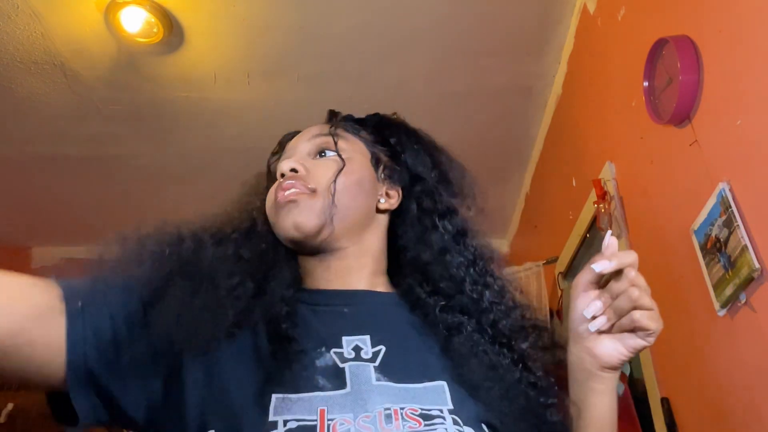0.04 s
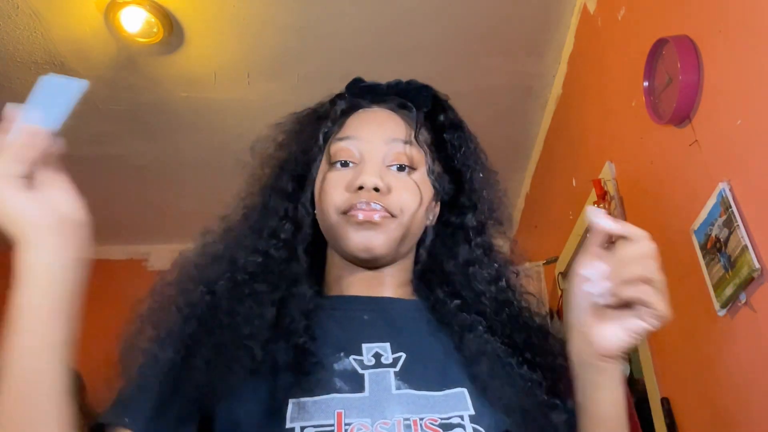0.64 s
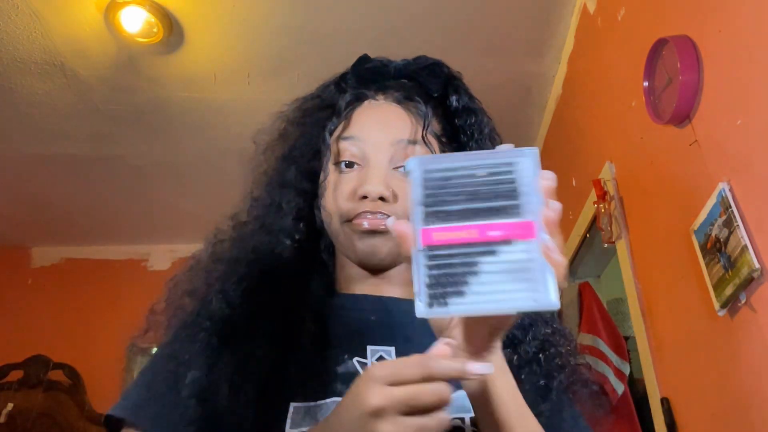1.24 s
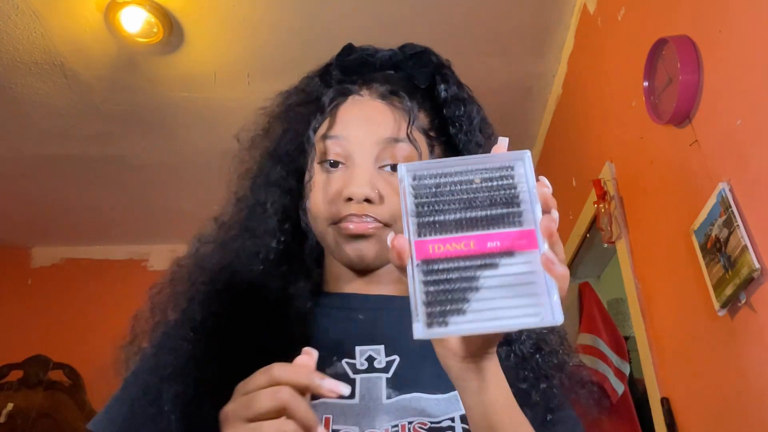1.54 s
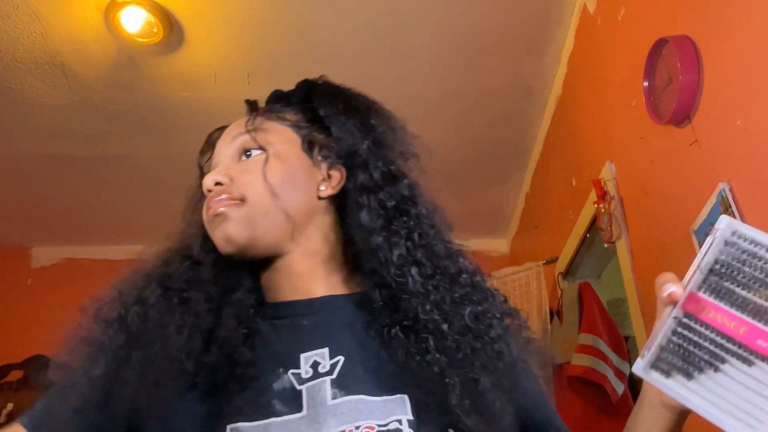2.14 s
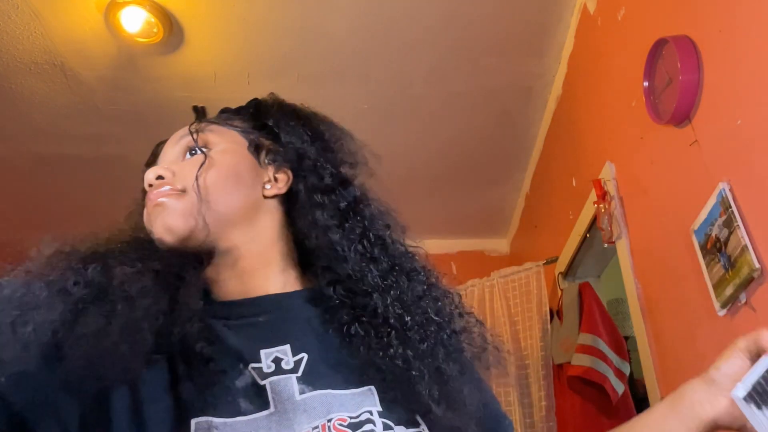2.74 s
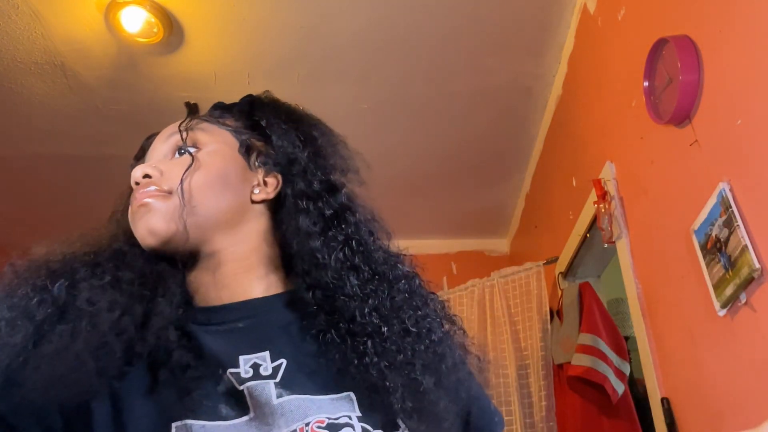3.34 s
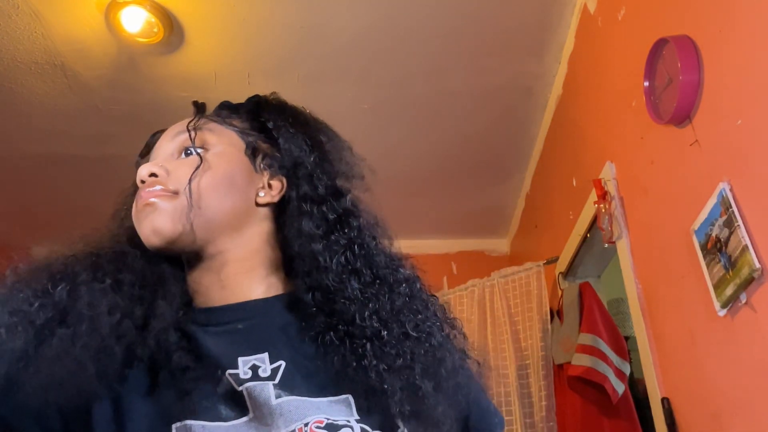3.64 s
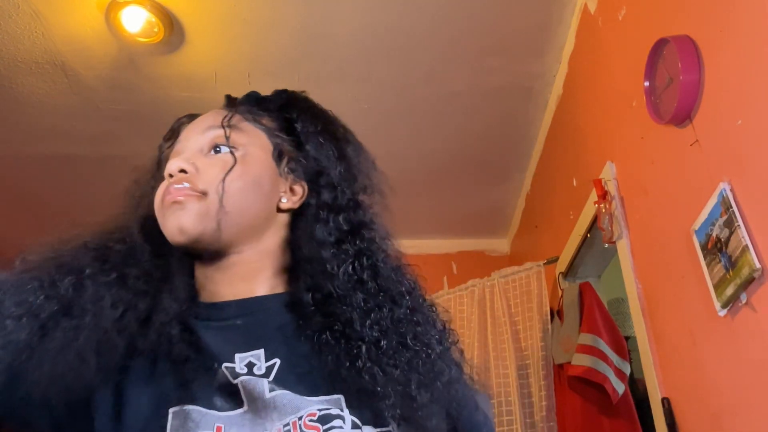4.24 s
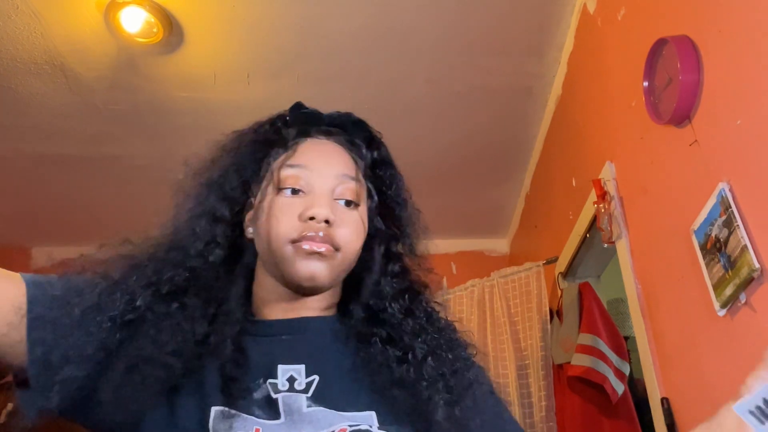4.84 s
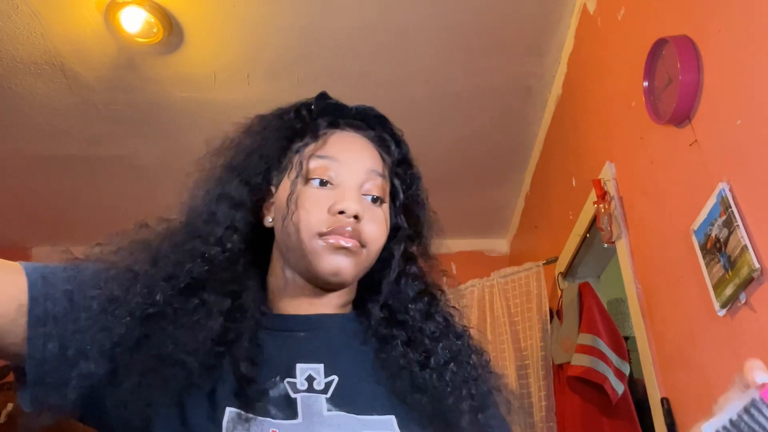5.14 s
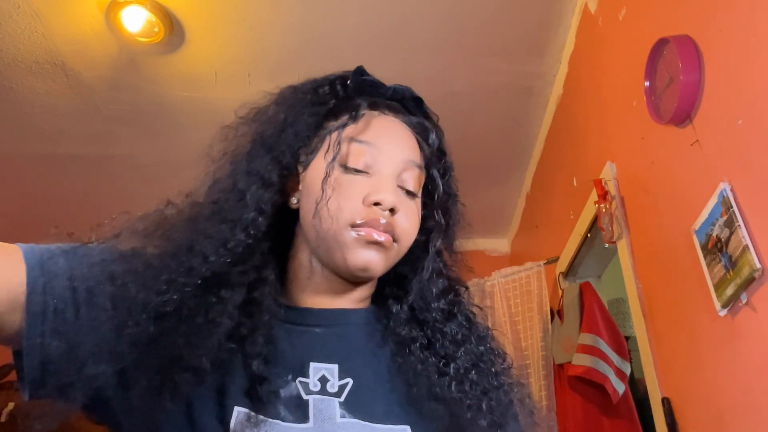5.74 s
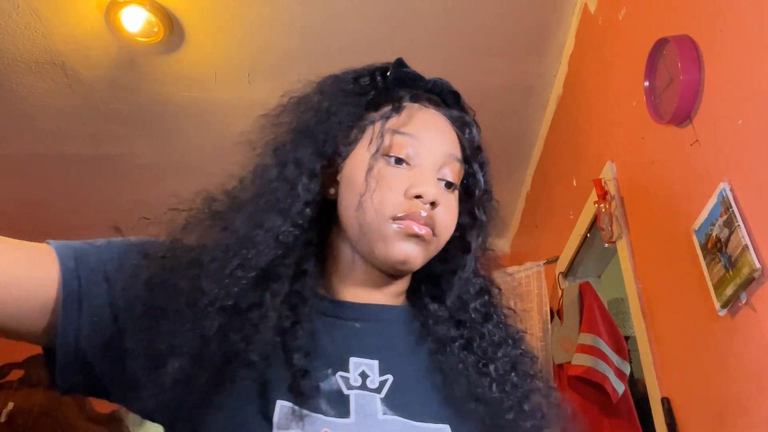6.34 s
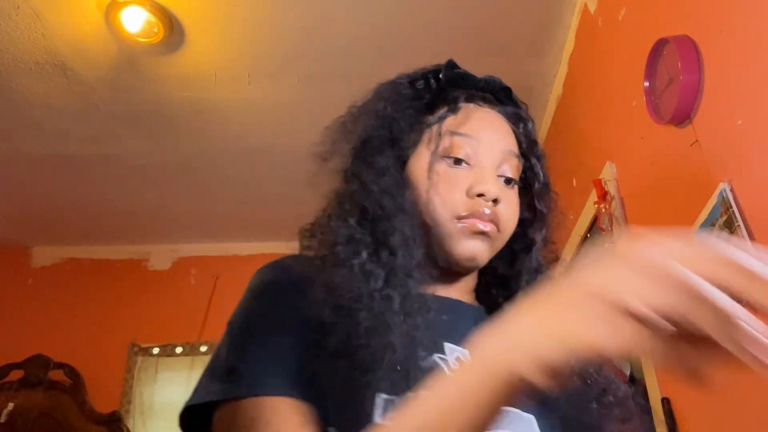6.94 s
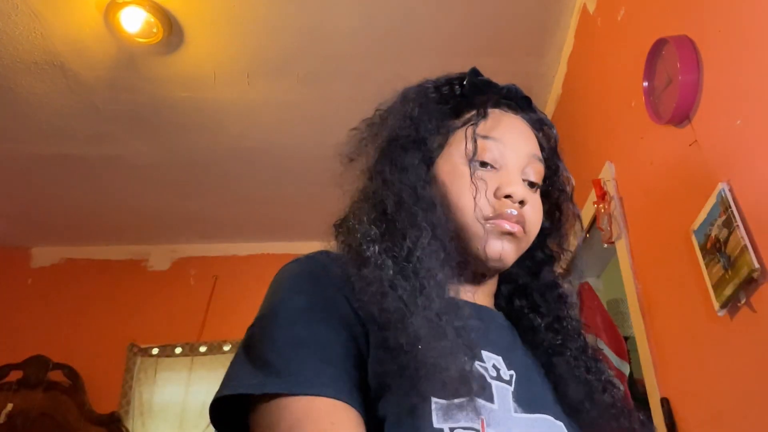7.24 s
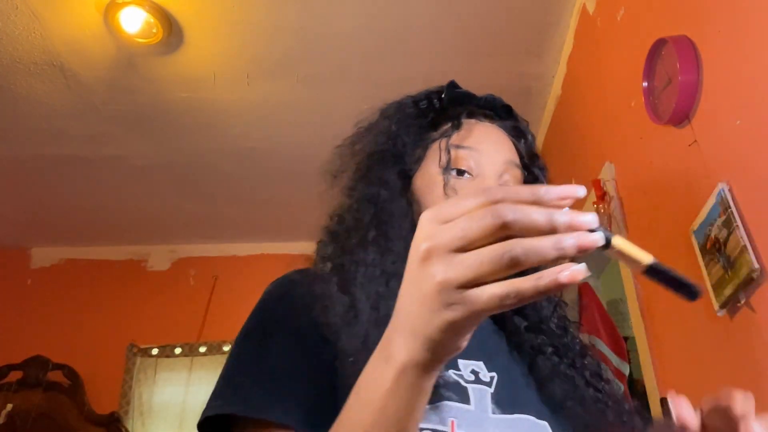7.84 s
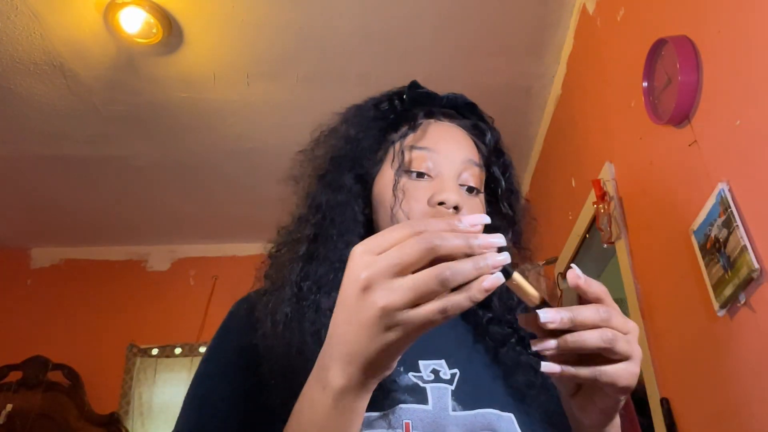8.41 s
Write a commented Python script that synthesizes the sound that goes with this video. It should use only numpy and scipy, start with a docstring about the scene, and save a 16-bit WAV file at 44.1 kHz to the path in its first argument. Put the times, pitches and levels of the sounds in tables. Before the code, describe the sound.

Makeup things are handled close to the microphone in a small, quiet bedroom, over soft room air and a faint low hum. It opens with light table knocks and a short scrape. At about 0.9 seconds a plastic lash case slaps sharply into a palm, with a low puff of air. After a lull, tiny objects jingle very faintly from 2.1 seconds, and from 2.7 to 4.4 the case is put down and items shift with soft knocks and clicks. A loud, hard knock comes at 5.2 seconds, followed by a tap with a brief clink. Another knock and a finger swish land near 5.9, and a click with a short high ring at 6.2. From 7.1 to 7.8, light tubes and handles clatter as a brush is picked out, then the room settles until about 8.4. Sleeve and hair rustle softly between the contacts.

```python
"""A small, quiet bedroom, where makeup things are handled close to the microphone.
A plastic lash case slaps into a palm with a puff of air and is put down; small items knock on a table,
click together and ring briefly, and a brush is picked out from among them. Each contact is a snap and
a short chatter, coloured by the object and the room. Hands, sleeve and hair rustle as grainy friction
noise over room air and a faint mains hum."""
import sys
import numpy as np
from scipy import signal
from scipy.fft import rfft, irfft, next_fast_len
from scipy.io import wavfile
from scipy.ndimage import uniform_filter1d, map_coordinates

SR = 44100
rng = np.random.default_rng(int(sys.argv[2]) if len(sys.argv) > 2 else 0)


def generate_wav(signal):
    """Clip the signal to [-1, 1] and save it as 16-bit WAV at the path in sys.argv[1]."""
    frames = np.transpose(np.atleast_2d(signal))
    scaled = np.clip(frames, -1, 1) * 32767
    pcm = np.round(scaled).astype(np.int16)
    wavfile.write(sys.argv[1], SR, pcm)


N = 373527
HIT_SAMPLES = 12288  # one hit with its tail

# The hits. Each row: start in seconds, main resonance in Hz, level in dB, brightness in dB per octave
# (hard contacts above 0, soft ones below).
CASE_SLAP = [(0.8625, 1150, -42, -0.11), (0.8648, 2800, -29.5, 0.28), (0.8662, 400, -20.0, -0.6),
             (0.871, 2750, -27, 0.31)]  # the lash case lands in the palm
TABLE_KNOCKS = [(0.201, 496, -39.5, 3.5), (0.264, 456, -42.5, 2), (0.317, 700, -42.5, 0),
                (0.401, 430, -54, -2), (2.738, 510, -46.0, -3.7), (2.859, 660, -37, -3),
                (2.985, 594, -34, 3.5), (3.01, 500, -37.5, 5), (3.124, 515, -53, 5.5),
                (3.239, 604, -56.5, -20), (3.271, 920, -47.5, 4.5), (3.323, 500, -49.5, -9.4),
                (3.68, 460, -49.0, 2.2), (3.977, 890, -41.0, 5), (4.05, 513, -42.5, 2),
                (4.078, 580, -49, -5.5), (4.164, 580, -56, 8), (4.237, 616, -45, -3.5),
                (4.315, 586, -55, 0), (4.376, 654, -49.5, -5), (5.179, 734, -23.5, 1.9),
                (5.191, 980, -32.0, 4), (5.229, 576, -40.5, -8.5), (5.868, 554, -29, 0),
                (6.163, 845, -42.5, 2)]
EDGE_CLICKS = [(0.053, 1830, -56.5, -9), (0.092, 1800, -67, -2), (0.598, 1780, -52.5, 1.7),
               (0.631, 1710, -53, -1.1), (0.65, 1430, -56, -1.4), (1.146, 2120, -60.5, -7.2),
               (2.303, 2920, -59, -5.5), (2.709, 7870, -57.5, -1.6), (2.958, 1870, -68, 4),
               (3.284, 3020, -59, -3), (3.67, 3340, -63.5, 0.5), (3.931, 1930, -58.5, 0.3),
               (4.024, 2740, -46.5, 1.5), (4.093, 1640, -65, 4.4), (4.194, 4230, -64.5, 5.5),
               (4.202, 4160, -56, -1.2), (4.366, 1600, -58.5, 2.5), (5.81, 2313, -66, 7.5),
               (5.818, 2040, -51, 2.5), (5.824, 4740, -59.5, 6.5), (5.837, 4270, -44.5, 2.5),
               (5.865, 1240, -43, 3), (5.915, 1640, -47.5, 2.9), (5.944, 2600, -60.5, 8.5),
               (6.006, 8140, -58.5, 2), (6.136, 1960, -53.5, 2.8), (6.15, 2450, -44, 0.8),
               (6.225, 3620, -51, 0.4), (6.315, 3510, -51.0, 3), (6.635, 3630, -55.5, -1.1),
               (7.604, 2920, -63.5, -0.5), (7.667, 2160, -51, -1)]  # nails and plastic edges
TUBE_TAPS = [(0.478, 1210, -57, -2), (0.711, 1200, -59, -3.5), (1.609, 1190, -56.5, -4.5),
             (2.454, 1300, -56.5, 1.5), (5.107, 990, -40, -0.8), (5.132, 900, -46, -0.5),
             (5.145, 940, -38.5, -2), (5.179, 910, -23, -2.5), (5.29, 800, -44.5, -5.5),
             (5.346, 1154, -32.5, -2.2), (5.539, 784, -42, -6.5), (7.088, 755, -45, -1),
             (7.117, 1910, -40, -4), (7.135, 1410, -47, 7), (7.144, 1560, -36.5, 2.5),
             (7.164, 1220, -44, 1), (7.218, 1950, -43, 1.3), (7.315, 2010, -49.5, 1),
             (7.353, 2050, -49.5, 0), (7.393, 706, -43, -2), (7.404, 710, -43.5, -11),
             (7.44, 1400, -43, -2.5), (7.458, 2100, -40.0, 0.5), (7.472, 1460, -38, 1.5),
             (7.483, 2400, -41.0, -0.5), (7.493, 1580, -40.0, 0), (7.504, 4160, -54.5, 8.5),
             (7.517, 2280, -41, 1), (7.533, 3370, -42.5, 0.8), (7.653, 1940, -41, 5.5),
             (7.75, 724, -43.5, -2.4), (7.851, 734, -55, -7)]  # light tubes, lids and handles
# The body of each struck thing. Each row: resonance in Hz, width in Hz, height in dB.
CASE_BODY = [(235, 56, 6.5), (398, 16, 16.5), (490, 44, 9.5), (650, 12, 5), (900, 57, 10), (1120, 85, 16),
             (1220, 26, 14.5), (1306.5, 110, 16), (1726, 150, 12.5), (2270, 75, 12), (2710, 78, 7),
             (2843, 70, 10.5), (3820, 330, 7.5)]
TABLE_BODY = [(200, 150, 6.8), (258, 20, 11.7), (484, 74, 12.4), (584, 63, 9.5), (750, 130, 5),
              (886, 55, 4.4), (1090, 87, 6.4), (1300, 20, 1.5)]
EDGE_BODY = [(1880, 160, 5.9), (3200, 320, 2.1), (4300, 310, 5), (15300, 610, 1.7)]
TUBE_BODY = [(560, 110, 2.8), (690, 110, 11.3), (796, 130, 15), (900, 78, 2.6), (1333, 71, 8.6),
             (1635, 170, 7.1), (1930, 190, 5.8), (2600, 100, 6.3), (3030, 240, 4.6), (4100, 940, 2.5),
             (6060, 140, 1.7), (7800, 280, 2.5)]
# The usual tone of each kind of hit. Each row: band centre in Hz, band level in dB relative to the hit.
SLAP_COLOUR = [(300, -4.5), (950, 0.5), (2700, -3), (9000, -11.5)]
KNOCK_COLOUR = [(300, 2), (950, -2), (2700, -10.5), (9000, -29)]
CLICK_COLOUR = [(300, 2), (950, -1), (2700, 1.5), (9000, -6.5)]
TAP_COLOUR = [(300, -8), (950, -2), (2700, -6), (9000, -22.5)]
# The four tone bands of a hit: their centres, then their edges, in Hz.
BAND_CENTRES_HZ = [300, 950, 2700, 9000]
BAND_EDGES_HZ = [140, 600, 1500, 5000, 16000]
# The tails of a hit. Each row: frequency in Hz, seconds to fall by 60 dB.
HANDHELD_DECAY = [(200, 0.063), (700, 0.036), (2500, 0.047), (6000, 0.014), (14000, 0.045)]  # each kind of hit shortens this by its decay_scale
ROOM_DECAY = [(150, 0.2), (400, 0.25), (1500, 0.25), (4000, .26), (14000, 0.13)]

# Blows that set small hard things ringing. Each row: start in seconds, strength in dB.
JAR_BLOWS = [(5.346, -40.5), (5.372, -55)]
CAP_BLOWS = [(6.183, -35.5)]
TRINKET_BLOWS = [(.003, -58.5), (.092, -57), (2.13, -69.5), (2.334, -61), (2.413, -59), (2.481, -61.5),
                 (2.548, -63), (2.638, -60.5), (2.709, -56)]
LID_BLOWS = [(2.86, -51.5), (3.24, -61.5)]
FERRULE_BLOWS = [(.201, -43), (7.472, -47.5), (7.654, -52)]
# Their partials. Each row: pitch in Hz, relative level in dB, seconds to fall by 60 dB.
JAR_MODES = [(1540, -14, 0.23), (1850, -6, 0.31), (2080, 0.5, 0.14), (2210, -4.5, 0.32), (2360, 2, 0.17),
             (3516, -4.5, 0.22), (9430, -18, 0.25)]
CAP_MODES = [(3700, -3.5, 0.28), (3940, 2.5, 0.098), (3920, -8, 0.058), (6907, -9.5, 0.13),
             (7000, -8, 0.057), (13930, -26, 0.107)]
TRINKET_MODES = [(2830, -1, 0.23), (4580, -6, 0.19), (5440, 1.5, 0.27), (5900, -31, .2), (8740, 2.5, 0.094),
                 (9100, -21, 0.084), (10500, -5, 0.14), (12600, -11, 0.12)]
LID_MODES = [(1683, 0.5, 0.47), (1860, -7, 0.19)]
FERRULE_MODES = [(7640, -10, 0.044), (9680, -0.5, 0.086)]

# Sleeve and hair brush along as the arm moves. Each row: peak time, rise and fall in seconds,
# level in dB, hiss in dB relative to that level.
ARM_SWEEPS = [(0.0, .02, 0.086, -62, -7.5), (1.04, 0.054, 0.066, -64, -10), (1.329, 0.17, 0.16, -77, -7.5),
              (1.729, .06, .15, -83, -2.5), (2.55, 0.38, 0.18, -77.5, -12), (2.89, 0.15, 0.15, -66, -9),
              (3.1, 0.14, 0.094, -59.5, -7), (4.15, 0.027, 0.023, -58.5, -7.5),
              (4.59, 0.16, 0.16, -64, -10), (5.255, 0.044, 0.033, -56, -12),
              (5.99, 0.033, 0.033, -65.5, -13), (6.23, 0.14, 0.082, -60.5, -8.5),
              (6.59, 0.087, 0.033, -68.5, -19), (6.87, 0.18, 0.22, -71, -3.5),
              (7.11, 0.1, 0.077, -62.5, -6), (7.6, 0.054, 0.046, -71, -23), (7.78, 0.1, 0.12, -78, 4.5)]
# Things drag over the table or through the fingers. Each row: peak time, rise and fall in seconds,
# level in dB.
DRAGS = [(.09, 0.11, 0.079, -60), (.28, 0.078, 0.045, -44.5), (.52, 0.11, 0.13, -66),
         (2.18, 0.077, 0.45, -63), (2.57, 0.072, 0.16, -65), (2.89, 0.049, .03, -53),
         (3.42, 0.025, 0.11, -74), (4.25, 0.38, 0.25, -64), (6.23, 0.025, 0.025, -54),
         (6.75, 0.28, 0.6, -64), (7.57, .1, 0.14, -60)]
# Fingers slide over plastic. Each row: peak time and half length in seconds, swish in dB, hiss in dB.
FINGER_SLIDES = [(0.197, 0.0062, -63, -79), (0.232, 0.034, -53.5, -63), (0.557, 0.044, -66.5, -96),
                 (1.038, 0.036, -77, -70), (1.299, 0.034, -69.5, -70.5), (5.838, 0.022, -47, -52),
                 (7.501, 0.031, -45, -56)]
# Air pushed by the swung case. Each row: peak time in seconds, level in dB.
AIR_PUFFS = [(0.876, -51), (.96, -46)]
# The tone of each noise layer. Each row: frequency in Hz, relative spectral density in dB.
SCRAPE_SPECTRUM = [(150, -29), (300, 1), (750, -2.5), (1400, -6.5), (2500, -38)]
SWISH_SPECTRUM = [(900, -24.5), (1600, 5), (3000, -1.5), (4400, -5.5), (6500, -31)]
HISS_SPECTRUM = [(3500, -28), (5200, 5.5), (10000, 4.5), (15500, -2)]
PUFF_SPECTRUM = [(45, -31.5), (70, -1.5), (130, -2), (220, -15.5), (500, -42)]
AIR_SPECTRUM = [(30, -48), (46, -30.5), (72, 1.5), (100, 1), (150, -4.5), (280, -0.5), (330, -9.5),
                (460, -7), (950, -19.5), (1400, -24.5), (1900, -24.5), (2300, -33), (5000, -37.5),
                (16000, -46)]

# The slow drift of the lowest hum tone. Each row: time in seconds, level in dB.
MAINS_LEVELS = [(0.1, -58.5), (1.1, -60), (2.4, -66), (3.4, -60.5), (5.2, -62), (6.25, -68), (7.4, -64),
                (8.15, -58.5)]
# The hum's upper tones. Each row: pitch in Hz, level in dB.
HUM_TONES = [(95, -73.5), (118, -70.5), (176.5, -65.5), (241, -69.5), (275, -73), (394, -70.5), (1920, -85)]

PIVOT_HZ, BASS_OCTAVES = 943, .7  # brightness tilts about this pitch and levels off this far below it
FOCUS_DB = 5  # lift of the bands around a hit's main resonance
LEVEL_SPAN_S = .01  # a hit's level counts its energy as spread over this time
CEILING_DELAY_S = .0115
MAINS_HZ, TOP_HZ = 58.6, 16000


def contacts(hits, body_modes, band_colour, *, snap, decay_scale, room_db, echo_db,
             main_db, main_q, low_hz, top_db):
    """Each contact is a snap and a short chatter that ring object and room; hardness sets the colour."""
    track, t = np.zeros(N), np.arange(HIT_SAMPLES) / SR
    hz = np.fft.rfftfreq(HIT_SAMPLES, 1 / SR)
    peaks = sum(resonance(hz, *mode) for mode in body_modes)
    body = np.sqrt((1 + peaks) / (1 + (low_hz / (hz + 1)) ** 8))  # small things radiate little bass
    body *= amp(along([(8000, 0.002), (15000, top_db)], hz))
    ceiling_gain = amp(echo_db + along([(3000, -1.5), (12000, -12)], hz))  # a duller copy comes back
    ceiling = ceiling_gain * np.exp(-2j * np.pi * hz * CEILING_DELAY_S)
    centres = np.array(BAND_CENTRES_HZ)
    octaves = np.maximum(np.log2(centres / PIVOT_HZ), -BASS_OCTAVES)
    for start, main_hz, db, brightness in hits:
        crack = rng.standard_normal(HIT_SAMPLES) * np.exp(-t / 0.00041)
        chatter = noise_tail(HANDHELD_DECAY, decay_scale) * (1 - np.exp(-t / .001))
        direct = snap * crack / np.linalg.norm(crack) + chatter
        walls = noise_tail(ROOM_DECAY) * (1 - np.exp(-t / .004))  # reflections take a moment to build
        # Hand and table reflect almost at once and comb each contact differently.
        near_delays = rng.uniform(.0003, .0018, (2, 1))
        comb = 1 + .5 * np.exp(-2j * np.pi * hz * near_delays).sum(axis=0)
        blow = comb * (rfft(direct) * (1 + ceiling) + amp(room_db) * rfft(walls))
        # Even out the blow's low range, so the object's own modes set the tone there.
        lumps = np.abs(uniform_filter1d(np.abs(blow) ** 2, size=56)) + 1e-9
        evening = lumps ** (-.5 * along([(1500, 1), (5000, 0)], hz))
        # The point of contact favours one resonance.
        main_peak = np.sqrt(1.5 + resonance(hz, main_hz, main_hz / main_q, main_db))
        focus = FOCUS_DB * np.exp(-np.log2(centres / main_hz) ** 2)
        band_db = db + along(band_colour, centres) + brightness * octaves + focus
        gain = balance_bands(blow, evening * body * main_peak, band_db, hz)
        add(track, start, irfft(blow * minimum_phase(gain)))
    return track


def ringing(blows, modes, blur, gain_db, blur_samples=300):
    """Hard things ring on in a few modes, which reflections make uneven."""
    track, t = np.zeros(N), np.arange(HIT_SAMPLES) / SR
    for start, blow_db in blows:
        for hz, mode_db, t60 in modes:
            scatter = unit(uniform_filter1d(rng.standard_normal((2, HIT_SAMPLES)), size=blur_samples))
            phase = 2 * np.pi * (hz * t + rng.random())
            tone = np.sin(phase) * (1 + blur * scatter[0]) + np.cos(phase) * blur * scatter[1]
            onset_db = gain_db + blow_db + mode_db + rng.normal(0, 1.5)
            envelope = amp(onset_db - 60 * t / t60) * (1 - np.exp(-t / .0005))
            add(track, start, tone * envelope)
    return track


def rustle():
    """Things drag while sleeve and hair brush along; the speed of each movement drives its noise."""
    sweeps = [(amp(db) * swell(s, rise, fall), amp(hiss_db)) for s, rise, fall, db, hiss_db in ARM_SWEEPS]
    brushing = sum(speed for speed, _ in sweeps)
    hissing = sum(speed * share for speed, share in sweeps)
    dragging = sum(amp(db) * swell(s, rise, fall) for s, rise, fall, db in DRAGS)
    scraping = np.hypot(dragging, brushing)  # cloth adds its own dull rub
    scrape = scraping * friction(SCRAPE_SPECTRUM, slips_per_s=200, grain=0.52, flutter_db=2.5)
    swish = brushing * friction(SWISH_SPECTRUM, slips_per_s=270, grain=0.21, flutter_db=2.5)
    hiss = hissing * friction(HISS_SPECTRUM, slips_per_s=960, grain=0.63, flutter_db=-0.9)
    return scrape + swish + hiss


def finger_slides():
    """Fingers slip over plastic; each slide swells and fades with a dry grain."""
    swish = sum(amp(db) * swell(s, half, half) for s, half, db, _ in FINGER_SLIDES)
    hiss = sum(amp(db) * swell(s, half, half) for s, half, _, db in FINGER_SLIDES)
    swish *= friction(SWISH_SPECTRUM, slips_per_s=620, grain=0.67, flutter_db=0)
    hiss *= friction(HISS_SPECTRUM, slips_per_s=1000, grain=0.72, flutter_db=0.5)
    return swish + hiss


def friction(spectrum, slips_per_s, grain, flutter_db):
    """Sliding skin, cloth and plastic: soft noise with tiny slips, under an uneven pressure."""
    slips = unit((rng.random(N) < slips_per_s / SR) * rng.standard_normal(N))
    rub = coloured(rng.standard_normal(N) + grain * slips, spectrum)
    return amp(flutter_db * wobble(45)) * rub


def air_puffs():
    """The swung case pushes soft, low puffs of air at the microphone."""
    push = sum(amp(db) * swell(s, rise=0.0082, fall=.045) for s, db in AIR_PUFFS)
    return push * coloured(rng.standard_normal(N), PUFF_SPECTRUM)


def room_tone():
    """Room air and the slightly wavering hum of an appliance; its upper tones waver more in pitch."""
    t, hum = np.arange(N) / SR, np.zeros(N)
    mains_db = np.interp(t, *np.transpose(MAINS_LEVELS))
    for hz, db in [(MAINS_HZ, mains_db)] + HUM_TONES:
        level = amp(db + 0.57 * wobble(4)) * np.sqrt(2)
        hum += level * np.sin(2 * np.pi * hz * t + hz / 200 * wobble(9.1))
    return hum + amp(-62) * coloured(rng.standard_normal(N), AIR_SPECTRUM)


def balance_bands(blow, colour, band_db, hz):
    """Tilt the colour curve smoothly so that each band of the blow comes close to its level."""
    bands = [(hz >= lo) & (hz < hi) for lo, hi in zip(BAND_EDGES_HZ, BAND_EDGES_HZ[1:])]
    tilt_db = np.zeros(len(bands))
    for _ in range(3):
        gain = colour * amp(along(np.c_[BAND_CENTRES_HZ, tilt_db], hz))
        power = np.abs(blow * gain) ** 2 * 2 / (HIT_SAMPLES * LEVEL_SPAN_S * SR)
        tilt_db = tilt_db + band_db - 10 * np.log10([power[band].sum() for band in bands])
    return gain


def noise_tail(decay, decay_scale=1):
    """Noise of energy 1 in which each frequency dies at its own speed."""
    hz, t, noise = signal.stft(rng.standard_normal(HIT_SAMPLES), SR, nperseg=128)
    t60 = along(decay, hz)[:, None] * decay_scale
    fading = noise * amp(-60 * t / t60) / np.sqrt(t60)
    tail = signal.istft(fading, SR, nperseg=128)[1][:HIT_SAMPLES]
    return tail / np.linalg.norm(tail)


def resonance(hz, centre, width, db):
    """Power gain that one resonance adds."""
    return amp(db) ** 2 / (1 + (2 * (hz - centre) / width) ** 2)


def minimum_phase(gain):
    """A filter with this gain that rings only after the blow, keeping the attack sharp."""
    cepstrum = irfft(np.log(np.maximum(gain, 1e-6)))
    cepstrum[1:HIT_SAMPLES // 2] *= 2
    cepstrum[HIT_SAMPLES // 2 + 1:] = 0
    return np.exp(rfft(cepstrum))


def swell(peak_s, rise, fall):
    """A movement that gathers speed up to its peak and comes to rest."""
    t = np.arange(N) / SR - peak_s
    return np.exp(-np.minimum(np.abs(t) / np.where(t < 0, rise, fall), 10) ** 2)


def wobble(rate):
    """A smooth random curve, rate knots a second."""
    knots = np.arange(N) * rate / SR
    coarse = np.linspace(0, knots[-1], 4000)
    heights = rng.standard_normal(int(knots[-1]) + 4)
    return np.interp(knots, coarse, map_coordinates(heights, [coarse]))


def coloured(noise, spectrum):
    """Noise shaped by a spectrum, rms 1."""
    size = next_fast_len(N + HIT_SAMPLES)
    gain = amp(along(spectrum, np.fft.rfftfreq(size, 1 / SR)))
    return unit(irfft(rfft(noise, size) * gain, size)[:N])


def along(points, hz):
    """Read a curve of (Hz, value) points on a log frequency axis."""
    point_hz, values = np.transpose(points)
    return np.interp(np.log(hz + 1), np.log(point_hz + 1), values)


def amp(db):
    """Decibels to gain."""
    return 10 ** (np.asarray(db) / 20)


def unit(x):
    """Scale to rms 1."""
    return x / np.sqrt(np.mean(x ** 2) + 1e-20)


def add(track, start_s, sound):
    """Mix a sound into the track."""
    start = max(round(start_s * SR), 0)
    track[start:start + len(sound)] += sound[:N - start]


def scene():
    """Hits, rings and rustle over the room tone, in mono."""
    hits = contacts(CASE_SLAP, CASE_BODY, SLAP_COLOUR, snap=0.97, decay_scale=0.85,
                    room_db=-5, echo_db=-12.5, main_db=3, main_q=6, low_hz=201, top_db=-2.5)
    hits += contacts(TABLE_KNOCKS, TABLE_BODY, KNOCK_COLOUR, snap=0.15, decay_scale=0.65,
                     room_db=-5.5, echo_db=-7, main_db=4, main_q=6.1, low_hz=163, top_db=-6.5)
    hits += contacts(EDGE_CLICKS, EDGE_BODY, CLICK_COLOUR, snap=0.77, decay_scale=0.35,
                     room_db=-2, echo_db=-6, main_db=10.5, main_q=6.1, low_hz=168.6, top_db=-7)
    hits += contacts(TUBE_TAPS, TUBE_BODY, TAP_COLOUR, snap=0.41, decay_scale=0.68,
                     room_db=-8, echo_db=-6, main_db=10.5, main_q=8.3, low_hz=162, top_db=-9)
    rings = ringing(JAR_BLOWS, JAR_MODES, blur=0.86, gain_db=-2.5)
    rings += ringing(CAP_BLOWS, CAP_MODES, blur=0.57, gain_db=-1.5)
    rings += ringing(TRINKET_BLOWS, TRINKET_MODES, blur=2.5, gain_db=-19.5, blur_samples=70)
    rings += ringing(LID_BLOWS, LID_MODES, blur=0.18, gain_db=0.5)
    rings += ringing(FERRULE_BLOWS, FERRULE_MODES, blur=1.0, gain_db=-2.5)
    return (hits + rings + rustle() + finger_slides() + air_puffs() + room_tone())[None]


def record(dry):
    """A steep high cut takes off everything above TOP_HZ."""
    size = next_fast_len(N + HIT_SAMPLES)
    hz = np.fft.rfftfreq(size, 1 / SR)
    return irfft(rfft(dry, size) / np.sqrt(1 + (hz / TOP_HZ) ** 160), size)[:, :N]


dry = scene()
out = record(dry)
generate_wav(out)
```